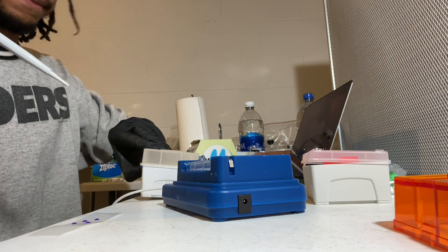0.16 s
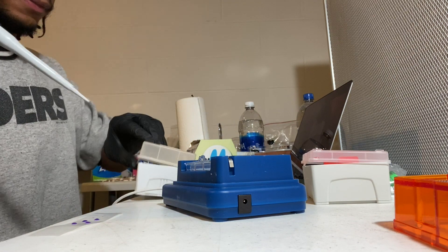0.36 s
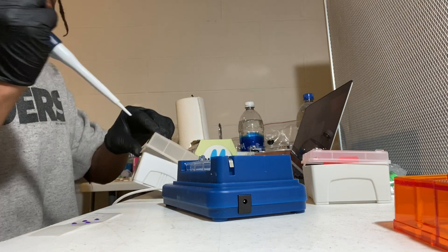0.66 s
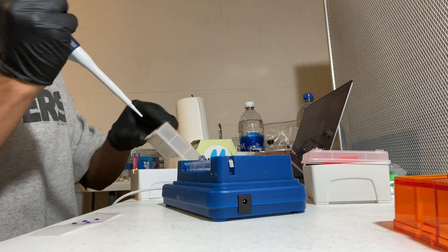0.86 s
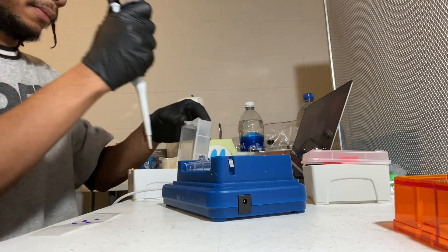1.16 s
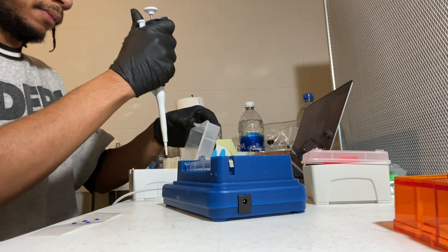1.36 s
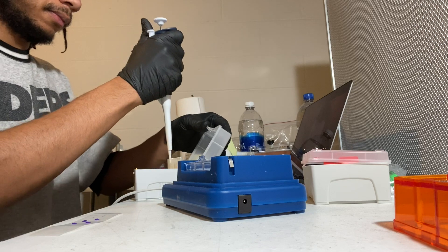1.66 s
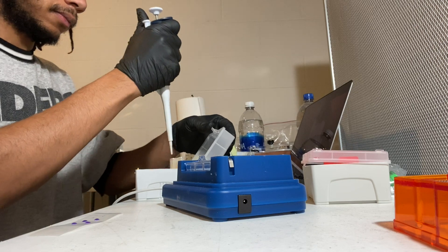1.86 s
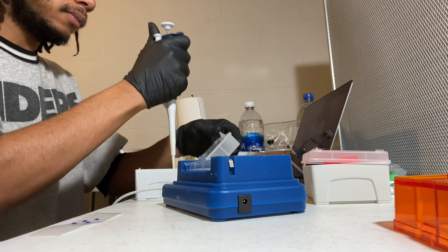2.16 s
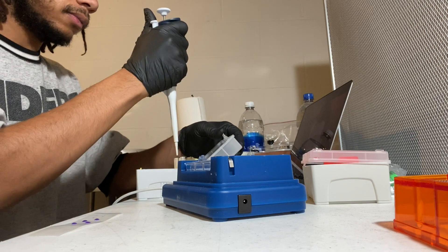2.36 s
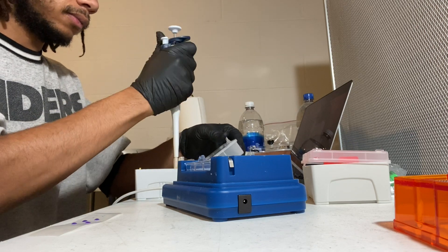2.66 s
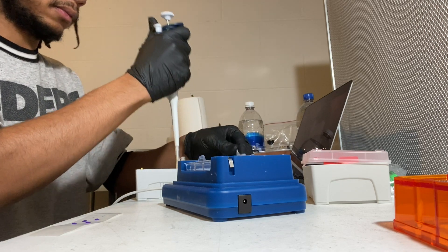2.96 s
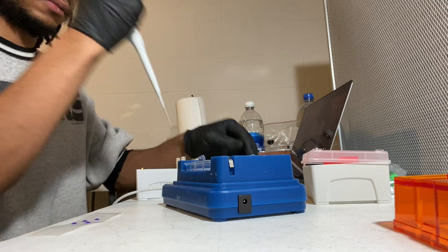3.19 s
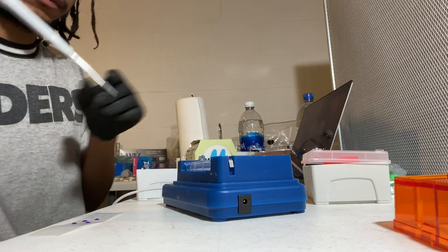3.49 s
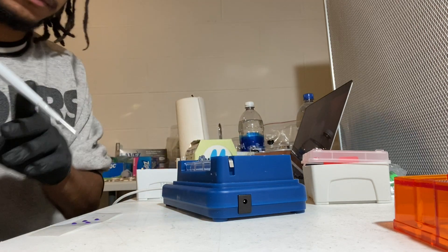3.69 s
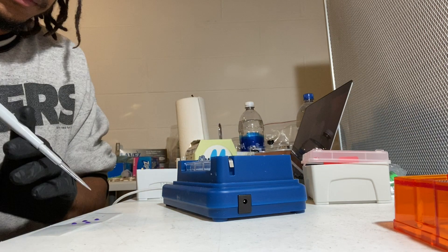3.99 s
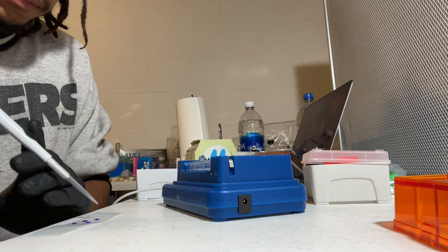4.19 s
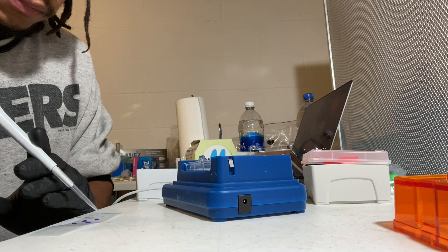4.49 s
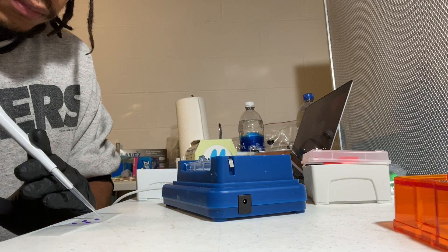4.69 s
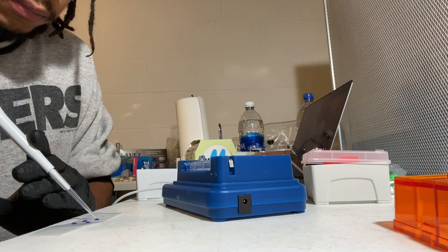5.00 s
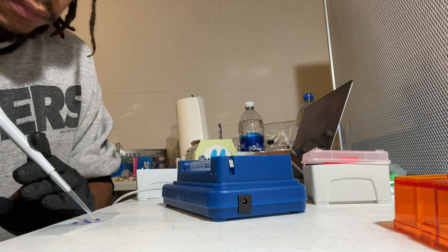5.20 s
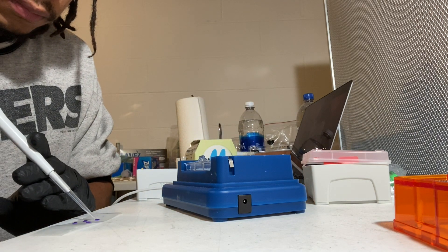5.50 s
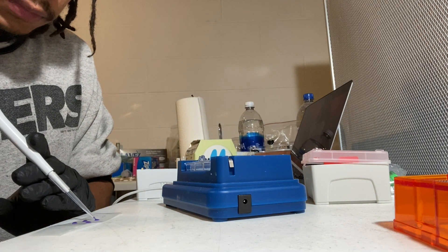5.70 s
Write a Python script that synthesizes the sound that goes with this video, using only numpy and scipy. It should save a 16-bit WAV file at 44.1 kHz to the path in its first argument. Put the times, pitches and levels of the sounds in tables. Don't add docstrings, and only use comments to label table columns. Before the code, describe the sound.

In a small lab, fans wash steadily over a low mains hum. A light plastic tip ticks, gloves rub briefly, then a thin lid knocks loudly. The tip rack clatters, the box base thuds on the bench, and a latch snaps shut brightly. A faint rubber squeak follows, then mostly fans until two tiny ticks near the end. Close stereo recorder on the bench, short room echo.

```python
import sys
import numpy as np
from scipy import signal
from scipy.fft import rfft, irfft
from scipy.io import wavfile
from scipy.ndimage import uniform_filter1d

SR = 44100
rng = np.random.default_rng(int(sys.argv[2]) if len(sys.argv) > 2 else 0)


def boost_factor(decibels):
    exponent = np.asarray(decibels, float) / 20
    return 10 ** exponent


def file_out(sig):
    cols = np.atleast_2d(sig).T
    lim = np.clip(cols, -1, 1)
    pcm = np.round(lim * 32767).astype(np.int16)
    wavfile.write(sys.argv[1], SR, pcm)


N = 257984


def evened(x):
    return x / np.sqrt(np.mean(x ** 2) + 1e-20)


def read(points, hz):
    f, value = np.transpose(points)
    return np.interp(np.log(hz + 1), np.log(f + 1), value)


def colour(x, points):
    n = x.shape[-1]
    gain = boost_factor(read(points, np.fft.rfftfreq(n, 1 / SR)))
    return irfft(rfft(x) * gain, n)


def fuzzy(hz, width_hz):
    r = np.exp(-np.pi * width_hz / SR)
    noise = rng.standard_normal(N) + 1j * rng.standard_normal(N)
    slow = signal.lfilter([1 - r], [1, -r], noise)
    carrier = np.exp(2j * np.pi * np.cumsum(hz * np.ones(N)) / SR)
    return evened((slow * carrier).real)


def fans(level_db=-30, patchy_db=0.93):
    # f/Hz, level/dB per Hz
    wash = [(20, -89), (45, -77), (65, -62), (100, -59), (160, -55), (220, -55), (400, -63.5), (800, -68),
            (1200, -76), (2000, -81.5), (4000, -88.5), (8000, -97.5), (10000, -105), (16000, -109)]
    # f/Hz, width/Hz, level/dB
    ducts = [(398.5, 88, 6.5), (505, 21, 4.5), (598.6, 26.5, 6.5), (1481, 140, 6.5), (2370, 810, 3.5),
             (4650, 600, 0.5)]
    # f/Hz, likeness/0..1
    likeness = [(40, 0.15), (120, 0.94), (210, 0.92), (400, 0.27), (700, 0.31), (2000, 0.066),
                (7000, 0.091)]
    # f/Hz, phase/rad
    lead = [(40, .1), (200, 0.59), (400, 1.4), (800, 3.56), (2000, 2.2)]
    # f/Hz, level/dB
    balance = [(40, -11), (130, -10.5), (290, -3), (640, -4), (1410, 0.5), (3100, 1.5), (6820, 1.5),
               (15000, 2)]
    hz = np.fft.rfftfreq(2048, 1 / SR)
    a, b, c, d, patches = rng.standard_normal((N // 512 + 5, 1025, 5)).T
    patches = uniform_filter1d(patches, size=20, axis=0)
    patches = evened(uniform_filter1d(patches, size=8, axis=1))
    shape_db = read(wash, hz)
    for f, width, db in ducts:
        shape_db = shape_db + db / (1 + (2 * (hz - f) / width) ** 2)
    same = np.clip(read(likeness, hz), 0, 1)[:, None]
    left = a + 1j * b
    shared = same * left * np.exp(1j * read(lead, hz))[:, None]
    right = shared + np.sqrt(1 - same ** 2) * (c + 1j * d)
    right = right * boost_factor(-read(balance, hz))[:, None]
    z = np.array([left, right]) * boost_factor(shape_db[:, None] + patchy_db * patches)
    x = signal.istft(z, nperseg=2048, noverlap=1536)[1][:, :N]
    return boost_factor(level_db) * x / np.std(x[0])


def hum(base_hz=119.9, lag=22, right_db=4.5):
    # multiple of the base pitch, steady level/dB, wavering level/dB
    partials = [(1, -29.3, -46), (3, -50, -52)]
    t = np.arange(N) / SR
    x = np.zeros(N)
    for k, db, waver_db in partials:
        x += boost_factor(db) * np.sqrt(2) * np.sin(2 * np.pi * k * base_hz * t)
        x += boost_factor(waver_db) * fuzzy(k * base_hz, width_hz=2.9)
    return np.array([np.roll(x, lag), boost_factor(right_db) * x])


def knocks(table, modes, tilt_db, soften_db, pan_db, alike=0.58, split=0.076, swell=1.18):
    lead = 512
    t = np.arange(-lead, 7680) / SR
    after = np.maximum(t, 0)
    out = np.zeros((3, N + len(t)))
    pan = boost_factor(np.array([[pan_db], [-pan_db], [0]]) / 2)
    reach = np.array([[1], [1], [.4]])
    for s, ring_db, crack_db, ms in table:
        treble_db = 4 * (tilt_db - soften_db * np.log2(ms / 2))
        shared, *own = rng.standard_normal((3, len(t)))
        shape = np.exp(-1000 * after / ms) * (1 - np.exp(-after / 0.00013))
        burst = (alike * shared + np.sqrt(max(1 - alike ** 2, 0)) * np.array(own)) * shape
        click = (t == 0) * np.linalg.norm(shape)
        crack_eq = [(100, -36), (500, 14.5), (1200, 11), (16000, treble_db)]
        crack = colour(np.vstack([burst, click]), crack_eq) / 2
        ring = 0
        for hz, db, t60 in modes:
            cluster = hz * (1 + split * np.tanh(hz / 1500) * rng.uniform(-1.5, 1, (3, 1, 1)))
            phase = rng.uniform(0, 2 * np.pi, (3, 1, 1))
            phase = phase + rng.normal(0, abs(1 - alike), (3, 3, 1)) * 2
            envelope = boost_factor(db - 60 * after / t60) * (1 - np.exp(-after * hz / swell))
            ring = ring + envelope * np.sin(2 * np.pi * cluster * t + phase).sum(0)
        sound = boost_factor(crack_db) * crack + boost_factor(ring_db) * ring / 2 * reach
        start = round(s * SR) - lead
        out[:, start:][:, :len(t)] += sound * pan
    return out[:, :N]


def tip():
    # f/Hz, level/dB, t60/s
    modes = [(620, 9, 0.034), (1280, 7, 0.021), (2760, -21, 0.0092), (5920, -10, 0.017)]
    # t/s, ring/dB, crack/dB, contact/ms
    contacts = [
        (.041, -22, -17.5, 4.7),
        (2.88, -30, -31, 3.4),
        (2.9345, -58, -29, 1.6),
        (5.765, -47, -32, 4),
        (5.83, -50, -36, 4),
    ]
    return knocks(contacts, modes, tilt_db=-1.3, soften_db=4.2, pan_db=.4)


def gloves(grains_per_s=1500, spread_db=4.5):
    # grip/s, level/dB, slide/s, let-go/dB per s
    strokes = [
        (0.199, -40.5, 0.019, 400),
        (.345, -43.5, 0.035, 134),
        (0.706, -43.5, 0.051, 4000),
        (.957, -44, .006, 500),
        (3.35, -66, .11, 102),
    ]
    # f/Hz, level/dB per Hz
    rub_eq = [(300, 7), (1000, 7.5), (3000, -3.5), (6000, -19.5), (12000, -33)]
    grip_share = 0.78
    t = np.arange(N) / SR
    level = np.zeros(N)
    for s, db, slide, fade_db in strokes:
        before = np.maximum(s - t, 0) / grip_share
        after = np.maximum(t - s - slide, 0)
        level += boost_factor(db - fade_db * (before + after))
    noise = rng.standard_normal(N) + 0.88 * rng.standard_normal((2, N))
    grain = boost_factor(spread_db * np.minimum(rng.exponential(1, N), 2.5))
    slips = noise * (.5 + grain * (rng.random(N) < grains_per_s / SR))
    return boost_factor(5) * level * evened(colour(slips, rub_eq))


def lid():
    # f/Hz, level/dB, t60/s
    modes = [(50, -8, .12), (86.6, -3.5, 0.18), (147.4, -2.5, 0.12), (308, 3.5, 0.049), (428, -8, 0.072),
             (526, 1, 0.072), (654, -9, 0.14), (772, -5, 0.029), (936, 0, 0.063), (1013, -3, 0.034),
             (1285, -2.5, 0.025), (1630, -13, 0.022), (1800, -36, 0.0088), (2755, -2.5, 0.018),
             (3290, -11.5, 0.048)]
    # t/s, ring/dB, crack/dB, contact/ms
    contacts = [
        (.700, -37, -33, 6.8),
        (.7405, -23, -47, 5),
        (.7435, -10, 1, 2.2),
        (.7457, -5.5, -2.4, 1.1),
        (.955, -48, -26, 3.8),
    ]
    return knocks(contacts, modes, tilt_db=-4, soften_db=2.5, pan_db=-4)


def rack():
    # f/Hz, level/dB, t60/s
    modes = [(790, -6, 0.044), (1110, -7, 0.027), (1500, -4, 0.027), (1875, -5, 0.046), (2220, -12, .02),
             (3600, -12, .015), (6000, -18, .015)]
    # t/s, ring/dB, crack/dB, contact/ms
    contacts = [
        (1.57, -46, -33, 4.4),
        (1.95, -50, -27.5, 6.7),
        (2.096, -17.5, -17.5, 6),
        (2.1005, -33, -19.5, 2.9),
        (2.1145, -28, -28, 2.2),
    ]
    return knocks(contacts, modes, tilt_db=-7, soften_db=.1, pan_db=.1)


def base():
    # f/Hz, level/dB, t60/s
    modes = [(64, 11, 0.16), (109, 4, 0.075), (189, 4.5, 0.041), (300, -5, 0.066), (594, -8, 0.052),
             (873, -10, 0.035), (1190, -13, 0.028), (1630, -8.5, 0.027), (2200, -13, .025),
             (3170, -17, 0.032), (5700, -18.5, 0.017)]
    # t/s, ring/dB, crack/dB, contact/ms
    contacts = [
        (2.51, -39, -41, 3.5),
        (2.584, -11, -20.5, 6.1),
        (2.590, -24, -17.5, 10),
        (2.603, -18, -25, 27),
    ]
    return knocks(contacts, modes, tilt_db=-6, soften_db=0.18, pan_db=.1)


def latch():
    # f/Hz, level/dB, t60/s
    modes = [(452, -3, 0.055), (570, -3, 0.062), (730, 1, 0.042), (1136, 0, 0.053), (1770, -8, 0.019),
             (950, -3, 0.025), (2266, -5.5, 0.048), (3540, -4, 0.018)]
    # t/s, ring/dB, crack/dB, contact/ms
    contacts = [
        (3.0765, -24, -23, 1.1),
        (3.0788, -10, -1, 1.83),
    ]
    return knocks(contacts, modes, tilt_db=-4.5, soften_db=.1, pan_db=-2.5)


def squeak(start_s=3.325, start_hz=7600, end_hz=5850, sag_s=0.059, catch_s=.02):
    # t/s, level/dB
    catches = [
        (3.345, -64),
        (3.47, -62),
    ]
    t = np.arange(N) / SR
    hz = end_hz + (start_hz - end_hz) * np.exp(-np.maximum(t - start_s, 0) / sag_s)
    level = sum(boost_factor(db) * np.exp(-((t - s) / catch_s) ** 2) for s, db in catches)
    return level * fuzzy(hz, width_hz=120)


def room(x, level_db=-6):
    # f/Hz, t60/s
    decay = [(200, 0.24), (1000, 0.2), (3000, 0.2), (6000, 0.19), (12000, 0.078)]
    taps = np.zeros((2, SR // 2))
    at = np.arange(200, 22000, 8) + rng.integers(0, 8, (2, 2725))
    np.put_along_axis(taps, at, rng.choice([-1., 1.], at.shape), 1)
    hz, t, z = signal.stft(taps, SR, nperseg=256)
    fade = boost_factor(-60 * t / read(decay, hz)[:, None]) + boost_factor(-20 - 60 * t / 0.66)
    build = 1 - np.exp(-t / 0.0055)
    tail = signal.istft(z * fade * build, SR, nperseg=256)[1]
    tail = tail / np.linalg.norm(tail[0])
    return boost_factor(level_db) * signal.fftconvolve(x, tail, axes=1)[:, :N]


def scene():
    hits = lid() + rack() + base() + latch() + tip()
    rub = gloves() + squeak()
    echo = room(hits[2:] + rub)
    return hits[:2] + rub + echo + fans() + hum()


def low_pass(x):
    return signal.sosfilt(signal.butter(12, 15840, fs=SR, output="sos"), x)


def record(dry):
    # f/Hz, level/dB
    mic = [(15, -29), (35, -1.5), (60, -4), (12000, 0.5), (15500, -4), (15850, -25)]
    port_hz, in_step_hz, turn_hz = 7840, 11950, 5500
    hz = np.fft.rfftfreq(N, 1 / SR)
    left, right = rfft(colour(dry, mic))
    share = 1 / (1 + np.exp((port_hz - hz) / 350))
    delayed = left * np.exp(-2j * np.pi * (hz - in_step_hz) / turn_hz)
    right = np.sqrt(1 - share ** 2) * right + share * delayed
    mix = np.clip(irfft([left, right], N), -.94, .94)
    return low_pass(mix)


dry = scene()
out = record(dry)
file_out(out)
```